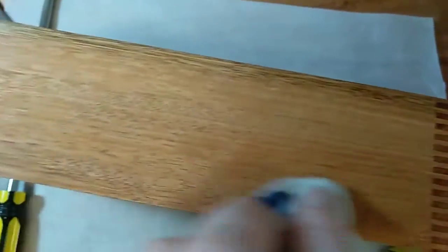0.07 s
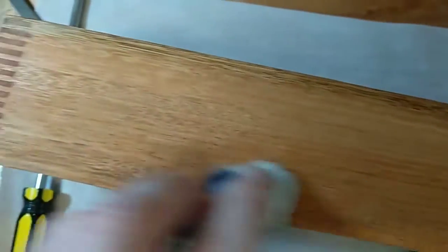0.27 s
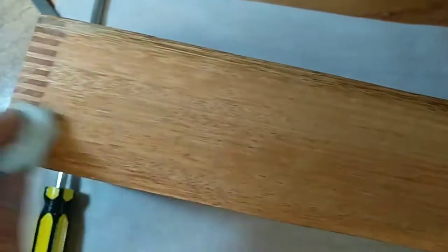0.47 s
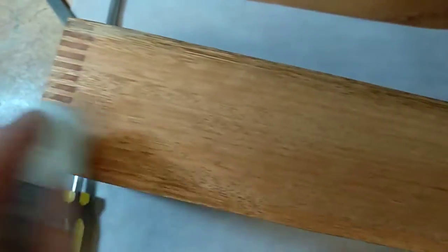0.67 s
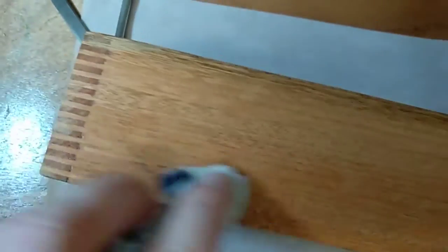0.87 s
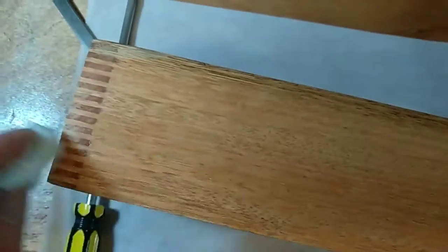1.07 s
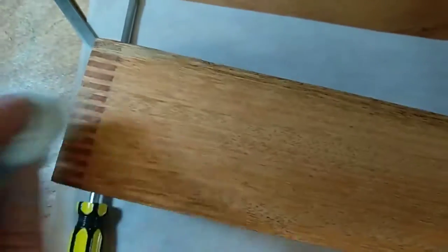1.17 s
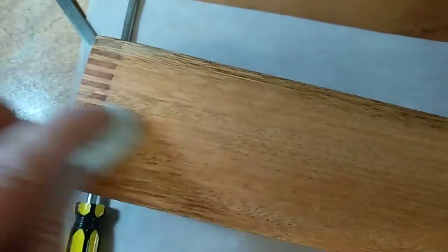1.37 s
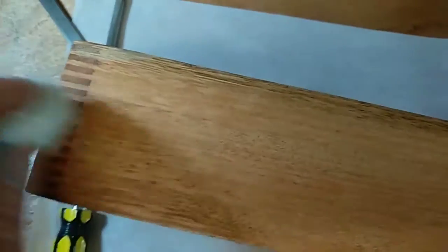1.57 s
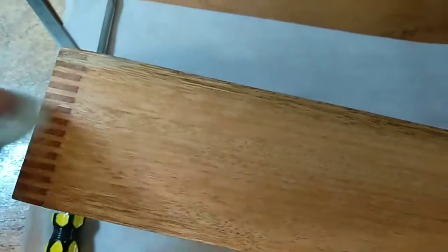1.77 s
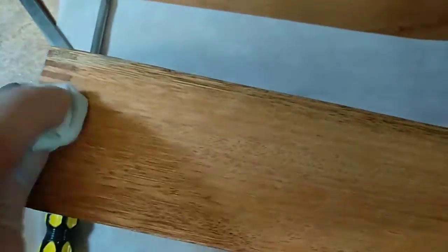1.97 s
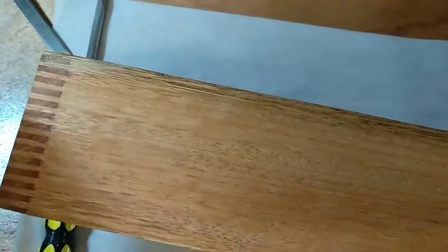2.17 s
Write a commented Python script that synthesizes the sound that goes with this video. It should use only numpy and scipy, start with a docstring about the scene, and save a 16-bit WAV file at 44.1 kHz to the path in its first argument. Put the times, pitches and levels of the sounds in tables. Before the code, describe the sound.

An oily rag swishes back and forth over a wooden box in brisk, bright, uneven strokes

```python
"""A quiet workshop: an oily cloth wipes a wooden box in quick strokes, close to a phone's one microphone.
Countless fibres catch on the grain: noise shaped into hiss, skim, rasp, box wall, ring and a hollow
under the hand. One hand movement drives them all, the wall sounding along when pressed harder.
Between strokes the cloth brushes lightly and ticks with short noise bursts. A brief echo follows;
the room adds faint air noise, a wavering low hum and two steady sine tones."""
import sys
import numpy as np
from scipy import signal
from scipy.fft import rfft, irfft
from scipy.io import wavfile
from scipy.ndimage import uniform_filter1d

SR = 44100
rng = np.random.default_rng(int(sys.argv[2]) if len(sys.argv) > 2 else 0)


def to_wav(s):
    """Save 16-bit WAV."""
    ch = np.atleast_2d(s).T  # columns
    pcm = np.round(np.clip(ch, -1, 1) * 32767)  # PCM
    wavfile.write(sys.argv[1], SR, pcm.astype(np.int16))


def field_ratio(decibels):
    """Amplitude ratio for a level in dB (20 dB per decade); scalars and array-likes work."""
    return 10 ** (np.asarray(decibels, dtype=float) / 20)


N = 98475  # samples, about 2.23 s


def set_rms(x, db):
    """Scale a sound to an rms level in dB."""
    return x * field_ratio(db) / np.sqrt(np.mean(x ** 2))


def colour(x, points, modes=()):
    """Shape by (Hz, dB) points on a log axis; (Hz, width Hz, dB) resonances add to that gain."""
    hz = np.maximum(np.fft.rfftfreq(len(x), 1 / SR), 1)
    point_hz, point_db = np.array(points, float).T
    gain = field_ratio(np.interp(np.log(hz), np.log(point_hz), point_db))
    lift = 1
    for mode_hz, width_hz, db in modes:
        lift = lift + field_ratio(db) / np.sqrt(1 + (2 * (hz - mode_hz) / width_hz) ** 2)
    return irfft(rfft(x) * gain * lift, len(x))


def walk(rate_hz):
    """Random values held for 1 / rate s and slewed twice, spread 1."""
    hold = int(SR / rate_hz)
    steps = np.repeat(rng.standard_normal(N // hold + 1), hold)
    smooth = uniform_filter1d(uniform_filter1d(steps, hold), hold)[:N]
    return smooth / smooth.std()


def air():
    """Steady workshop air: stationary noise, heaviest in the lows."""
    # Air spectrum: (frequency [Hz], relative density [dB])
    air_curve = [(20, -1), (35, -20), (50, -4), (62, -4), (80, -1.5), (110, -2.5), (200, -8), (350, -6.5),
                 (800, -12), (1500, -12), (2100, -14), (4000, -16.5), (6000, -16), (9000, -12.5),
                 (12000, -14), (16000, -18.5)]
    return set_rms(colour(rng.standard_normal(N), air_curve), -63.5)


def hum():
    """A low sine whose pitch and level waver at random."""
    pitch_hz = 50.2 + 1.1 * walk(6.4)
    swell = field_ratio(2.1 * walk(5.6))  # spread in dB
    return set_rms(np.sin(2 * np.pi * np.cumsum(pitch_hz) / SR) * swell, -75)


def faint_tones(t):
    """Two steady sines, barely there."""
    # Tones: (frequency [Hz], rms level [dB])
    tone_list = [(601, -83.5), (1001, -89)]
    return sum(set_rms(np.sin(2 * np.pi * hz * t), db) for hz, db in tone_list)


def echo(near):
    """Short diffuse return off bench and walls: convolution with exponentially decaying noise."""
    echo_db, t60_s = -13.5, 0.086
    tail_t = np.arange(SR // 2) / SR
    tail = rng.standard_normal(SR // 2) * field_ratio(-60 * tail_t / t60_s)
    tail = tail / np.sqrt(np.sum(tail ** 2))
    return field_ratio(echo_db) * signal.fftconvolve(near, tail)[:N]


def ticks(t):
    """Short bright snaps of single fibres: peaked noise starting at once and decaying exponentially."""
    # Snaps: (time [s], nominal peak level [dB], pitch [Hz])
    snap_list = [(.895, -44.5, 8070), (1.379, -48, 8450), (1.401, -49, 9220), (2.0393, -44, 12000)]
    decay_s = 0.0013
    out, noise = np.zeros(N), rng.standard_normal(N)
    for start_s, peak_db, hz in snap_list:
        peak_curve = [(hz / 4, -24), (hz * 0.73, -8), (hz, 0), (hz * 1.2, -9), (hz * 1.5, -16)]
        band = set_rms(colour(noise, peak_curve), peak_db - 5)  # rms sits below the peaks
        out += band * np.exp(-np.maximum(t - start_s, 0) / decay_s) * (t >= start_s)
    return out


def fibres():
    """Dense catches of slightly uneven size: noise with a random gain on every sample."""
    grain_db, grain_top = 1.2, 4  # dB per unit of the random size, largest size
    size = np.minimum(rng.exponential(size=N), grain_top)
    return rng.standard_normal(N) * field_ratio(grain_db * size)


def rubbed(curve, gain_db, modes=()):
    """One layer of rubbing: fresh fibre noise, coloured, following the hand with its own flicker."""
    flicker_db = 0.86 * walk(35.075)
    return set_rms(colour(fibres(), curve, modes), 0) * field_ratio(gain_db + flicker_db)


def hollow(rub_db, cup_db):
    """A narrow treble resonance of the hollow under the cupped hand."""
    # Hollow spectrum: (frequency [Hz], relative density [dB])
    hollow_curve = [(9000, -26), (10000, -6), (10500, -0.5), (10900, -4.5), (11500, -5.5), (12500, -28)]
    return rubbed(hollow_curve, rub_db + cup_db)


def wall_ring(rub_db, ring_db):
    """The box wall's ring: one resonance driven by the fibres."""
    ring_hz, ring_width_hz = 2150, 190
    ring_curve = [(1000, -20), (ring_hz, 0), (4000, -20)]
    return rubbed(ring_curve, rub_db + ring_db, [(ring_hz, ring_width_hz, 30)])


def box_wall(rub_db, press_db):
    """The wall's broad midrange and three resonances, louder in the mix under pressure."""
    # Wall spectrum: (frequency [Hz], relative density [dB])
    wall_curve = [(150, -66), (500, -41), (1000, -25), (1500, -9), (2000, -5.5), (2500, -3.5), (3200, -3),
                  (4300, -3.5), (5300, -8.5), (6500, -26.5)]
    # Wall resonances: (frequency [Hz], width [Hz], strength added to the curve [dB])
    wall_modes = [(2810, 63, -7.5), (3320, 250, -5.5), (4495, 48, -8.5)]
    return rubbed(wall_curve, rub_db + press_db, wall_modes)


def rasp(rub_db, press_db):
    """Weave dragging on the grain; it follows pressure less than the wall does."""
    # Rasp spectrum: (frequency [Hz], relative density [dB])
    rasp_curve = [(3500, -21.5), (4500, -4), (5300, 0), (6300, -2), (7200, -5.5), (8500, -28)]
    share_db = -6 + 0.47 * press_db
    return rubbed(rasp_curve, rub_db + share_db)


def fine_skim(rub_db, skim_db):
    """Fine fibres skimming the wood: the airy top of the rub."""
    # Skim spectrum: (frequency [Hz], relative density [dB])
    skim_curve = [(10500, -26.5), (12000, 6), (13800, 7), (15200, 6), (16500, -10.5)]
    return rubbed(skim_curve, rub_db + skim_db)


def hiss(rub_db):
    """The main body of the rub: countless catches fusing into a treble hiss."""
    # Hiss spectrum: (frequency [Hz], relative density [dB])
    hiss_curve = [(2500, -43), (4500, -16), (6000, -17), (7000, -7.5), (8000, -4.5), (8700, -1),
                  (9500, -2.5), (10200, -7), (11600, -15), (13000, -40)]
    return rubbed(hiss_curve, rub_db)


def cloth(t):
    """One hand movement drives every rubbing layer, with a stutter they all share."""
    # Hand movement, rows grouped by stroke or light brush: (time [s], rubbing level [dB],
    # box wall share, i.e. pressure [dB], fine skim share [dB], wall ring share [dB],
    # cupped hand resonance share [dB]); shares are relative to the rubbing level
    hand_moves = [
        [(0.0, -49.5, -12.5, -9, -14, -6), (0.012, -43.5, -9.5, -2, -25, -3), (0.05, -42.5, -7, -3, -16, 1.5),
         (0.064, -39, -11.5, -9.5, -16, -7.5), (0.164, -42, -7, 3.5, -10.5, -9),
         (0.182, -41.5, -8.5, -2, -19, -4.5), (0.242, -45.5, -11, -1, -13.5, -3), (0.27, -54, -4, -4, -14, -4)],
        [(0.28, -63, -11, -6, -13, -5), (0.308, -66, -1, -2, -5, -5), (0.33, -53.5, -6, -4, -2, -6)],
        [(0.34, -52.5, -8, -1, -7, -8), (0.348, -49.5, -6, -2.5, -5, 0), (0.428, -45, -8.5, -5.5, -10, -3),
         (0.498, -43.5, -7, -1, -7, -9), (0.568, -41.5, -8, -7.5, -17, -9), (0.674, -46, -6, -11, -15.5, -8),
         (0.752, -76, -11, -9, -10, 0), (0.754, -77, -3, -7, -5, -11), (0.85, -88, -8, -7, -12, -5)],
        [(0.85, -80, -7, -4, -6, -7), (0.86, -83, -4, 0, 0, -6), (0.87, -69, -15, -8, -14, -6),
         (0.888, -68, -3, -9, 0, -14), (0.894, -63.5, -5, -11, -10, -8), (0.918, -73.5, -3, -11, -8, -5),
         (0.934, -59, -2.5, 0, -8, -4), (0.944, -63, -4, -4, -11, -4), (0.99, -63.5, -4, -4, -2, -8),
         (1.0, -62, -6, -4, -8, -6)],
        [(1.0, -55, -8, 0, 5, 3), (1.012, -48, -4, 0, -10.5, -0.5), (1.036, -43.5, -12, -1, -16, -9),
         (1.068, -43.5, -7, 0.5, -7.5, -2.5), (1.13, -41.5, -11, -4.5, -17.5, -8),
         (1.172, -39, -7.5, -10, -12, -6), (1.202, -38.5, -9, -8, -17, -7.5),
         (1.264, -63.5, -13.5, -13, -13, -3), (1.29, -76, -9, -7, -2, -2), (1.3, -74, -14, -11, -13, -6)],
        [(1.36, -74, -6, -10, -19, -3), (1.374, -69, -5, -11, -8, -10), (1.382, -63, -7, -14, -17, -8),
         (1.394, -70, -3, -7, -5, -7), (1.402, -68, -9, -15, -9, -16), (1.416, -83, 5, -1, 1, 0),
         (1.44, -79, -1, 0, 3, 1)],
        [(1.445, -68, -1, -1, -9, -4), (1.477, -46.5, -3.5, -4, -14, -10), (1.515, -41, 2, -9, -7, -3),
         (1.551, -37, -2.5, -11, -11, -5.5), (1.581, -43, -6, -8, -17.5, -10), (1.6, -57.5, -7, -9, -18, -1)],
        [(1.61, -59, -9, -7, -16, -4), (1.634, -66, -7, -11, -12, -7), (1.666, -80, 4, 1, 3, 9),
         (1.68, -87, -4, -4, 1, -8)],
        [(1.765, -86, 9, -6, 3, -4), (1.779, -62.5, -2, -14, -14, -17), (1.811, -60.5, -6.5, -10, -15, -18),
         (1.841, -41.5, -3, -10, -9.5, -6), (1.879, -36.5, 0, -11, -7, -9.5), (1.923, -39, -6.5, -9, -21, -10),
         (1.94, -47.5, -8, -9, -16, 1)],
        [(1.945, -57, -27, -10, -15, -2), (1.957, -58, -7, -7, -9, -3), (1.989, -67.5, -12, -11, -5, -4),
         (2.03, -89, 1, -2, -5, -4)],
        [(2.066, -72, -7, -11, -9, -11), (2.074, -48.5, -10.5, -11, -16, -19),
         (2.088, -47.5, -7, -14, -8.5, -19), (2.126, -61, -5, -10, -15, -16), (2.14, -61, -5, -20, -10, -8)],
        [(2.145, -62.5, -2.5, -15, -9, -4), (2.173, -43.5, 1, -13, -13, -8), (2.207, -35.5, -6, -10, -11, -7.5),
         (2.23, -41.5, -7, -10, -22, -2)],
    ]
    moves = np.array([row for stroke in hand_moves for row in stroke], float)
    curves = [uniform_filter1d(np.interp(t, moves[:, 0], column), size=100) for column in moves.T[1:]]
    rub_db, press_db, skim_db, ring_db, cup_db = curves
    rub_db = rub_db + 0.68 * walk(90)  # shared stutter, dB
    bright = hiss(rub_db) + fine_skim(rub_db, skim_db) + rasp(rub_db, press_db)
    woody = box_wall(rub_db, press_db) + wall_ring(rub_db, ring_db)
    return bright + woody + hollow(rub_db, cup_db)


def scene():
    """Cloth and ticks with their short echo, over the room; both channels alike."""
    t = np.arange(N) / SR
    room = air() + hum() + faint_tones(t)
    near = cloth(t) + ticks(t)
    return np.tile(near + echo(near) + room, (2, 1))


def roll_off(x):
    """The treble ends steeply here."""
    return signal.sosfilt(signal.butter(12, 16220, fs=SR, output="sos"), x)


def record(dry):
    """The phone cuts the top with a steep elliptic low-pass."""
    top_hz = 15830
    low_pass = signal.ellip(10, 0.2, 70, top_hz, fs=SR, output="sos")  # ripple, stopband in dB
    mix = signal.sosfilt(low_pass, dry)
    return roll_off(mix)


dry = scene()
out = record(dry)
to_wav(out)
```